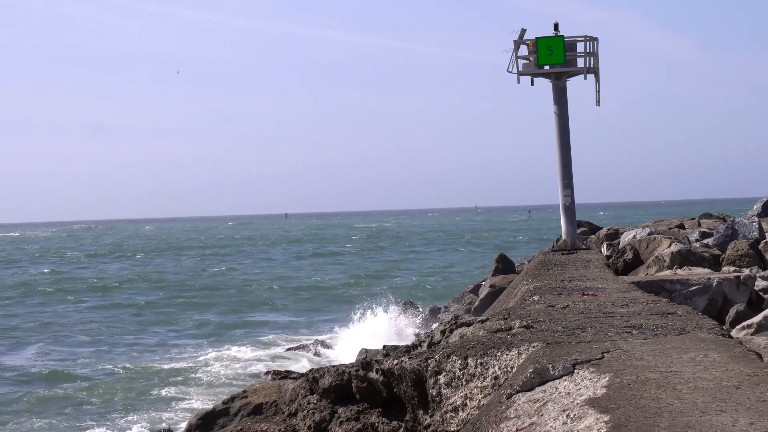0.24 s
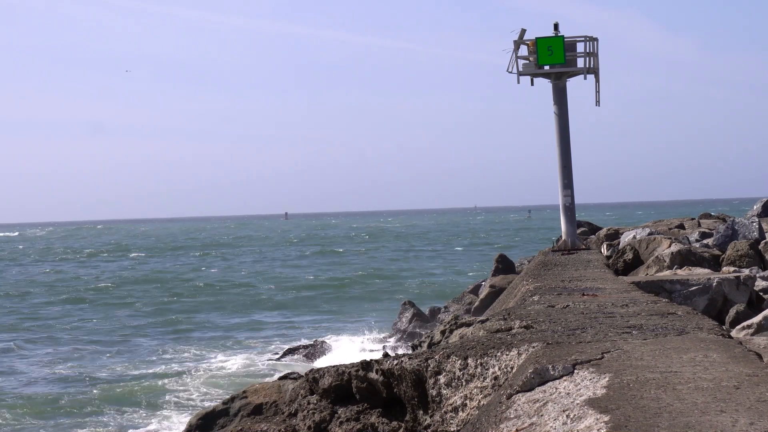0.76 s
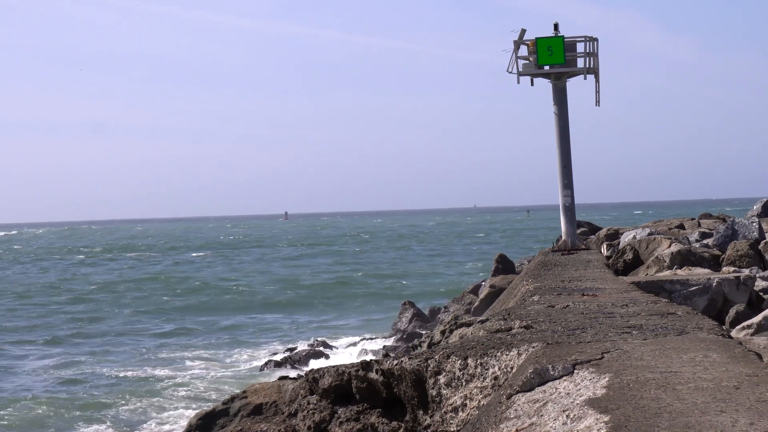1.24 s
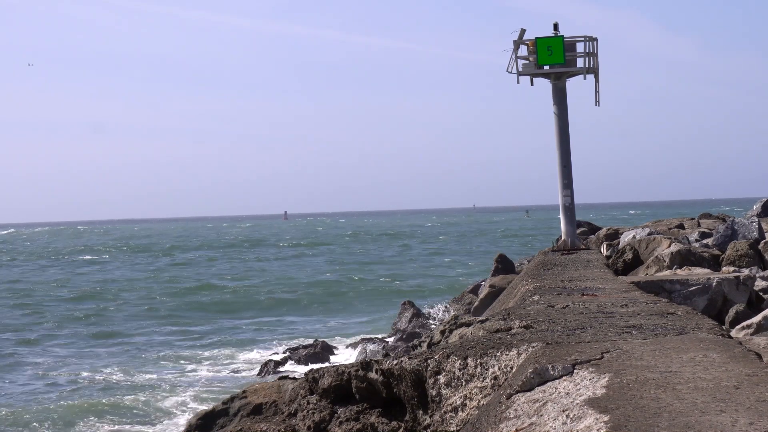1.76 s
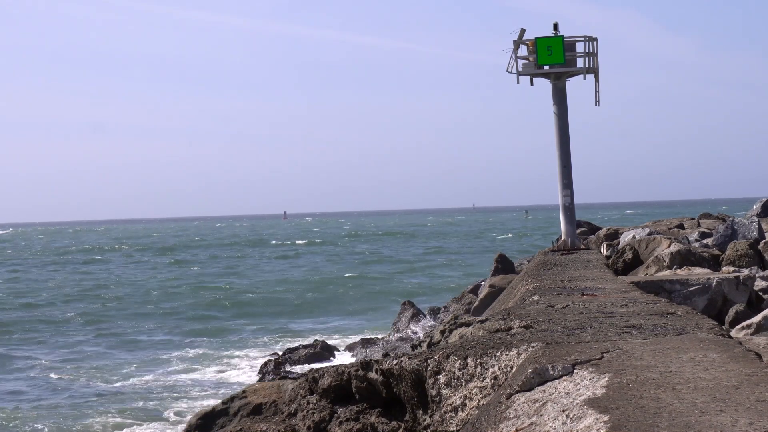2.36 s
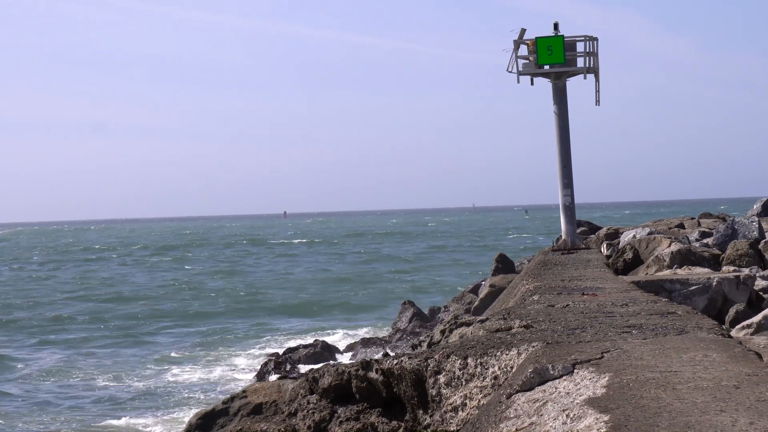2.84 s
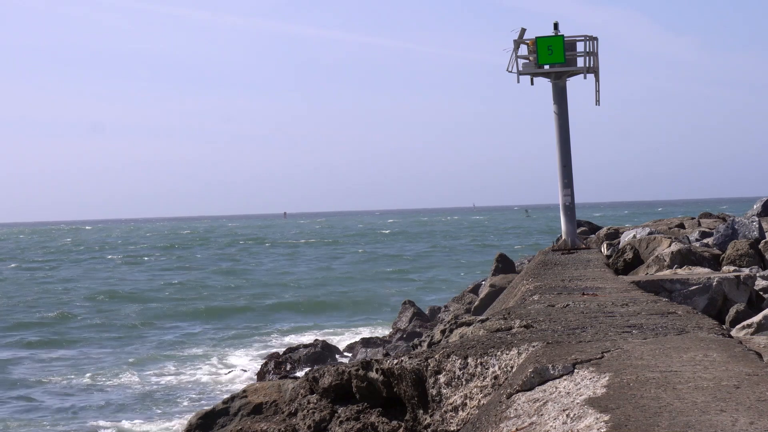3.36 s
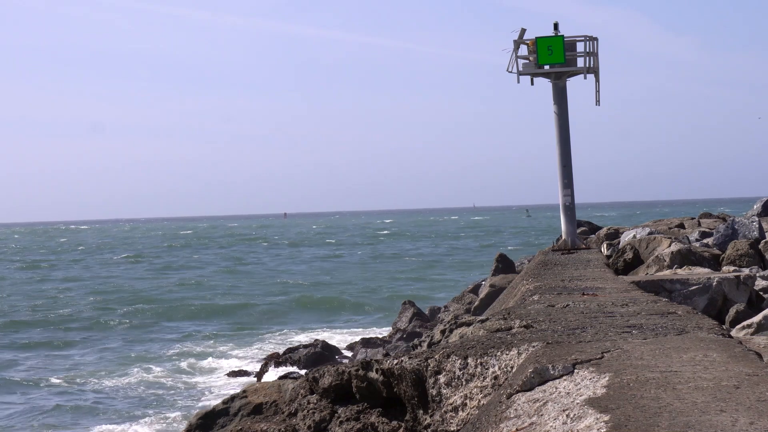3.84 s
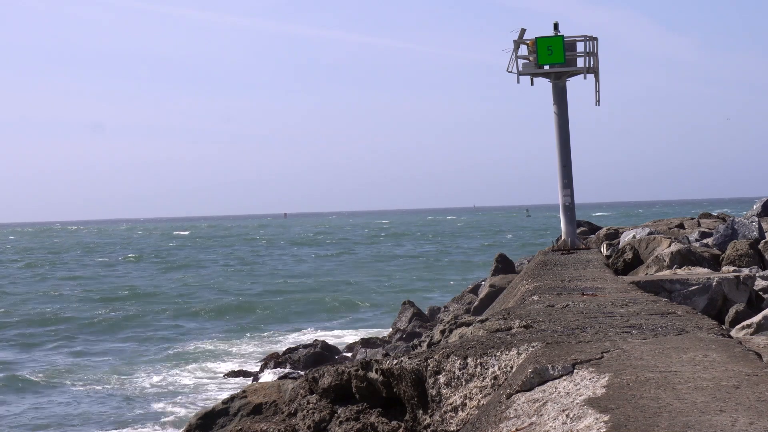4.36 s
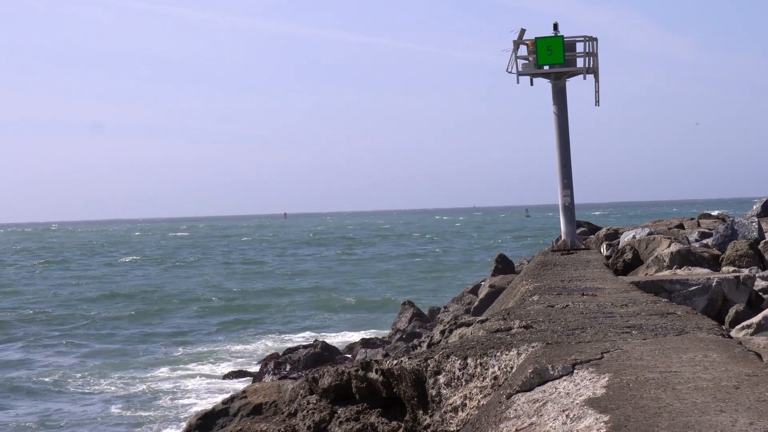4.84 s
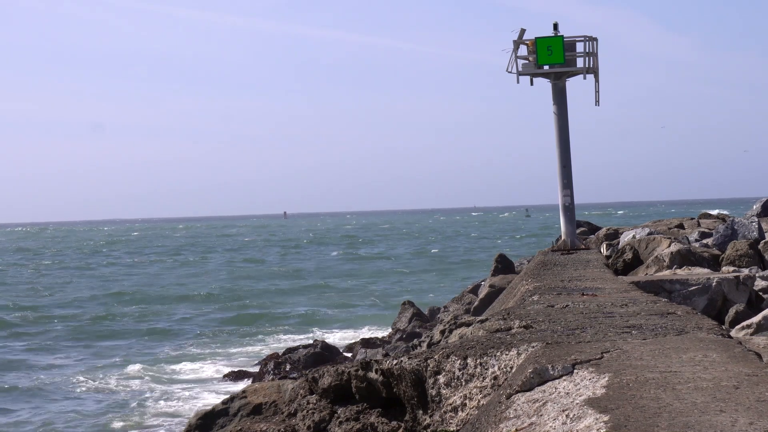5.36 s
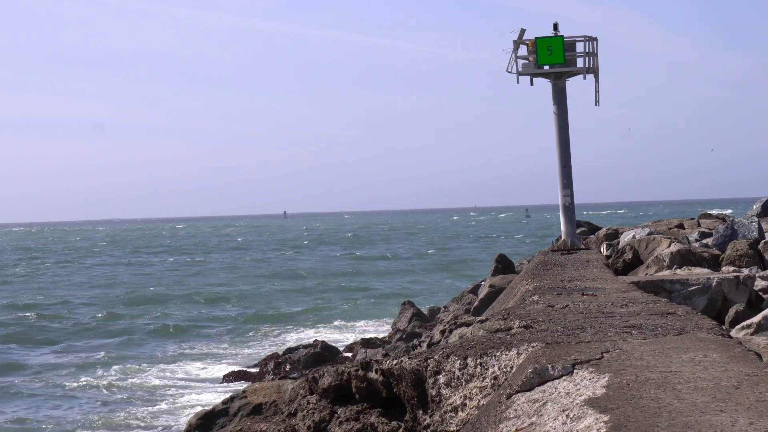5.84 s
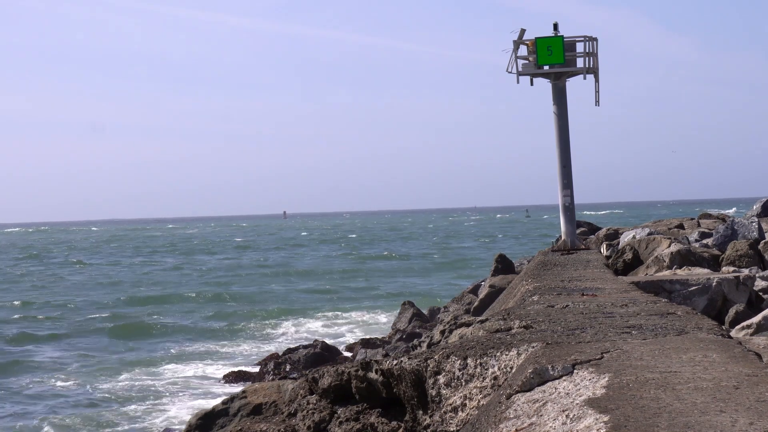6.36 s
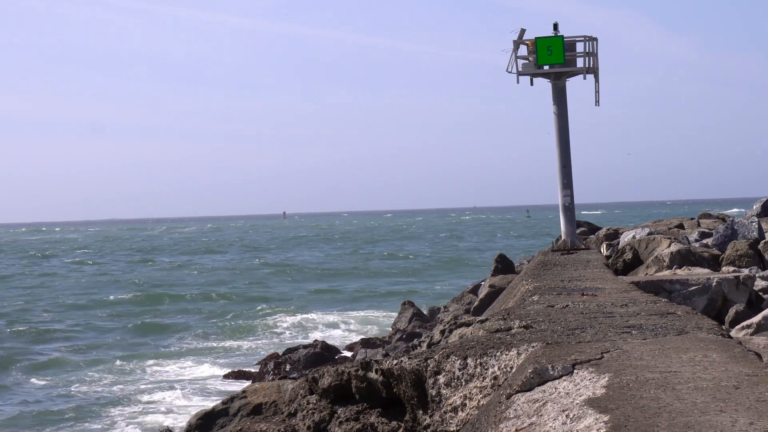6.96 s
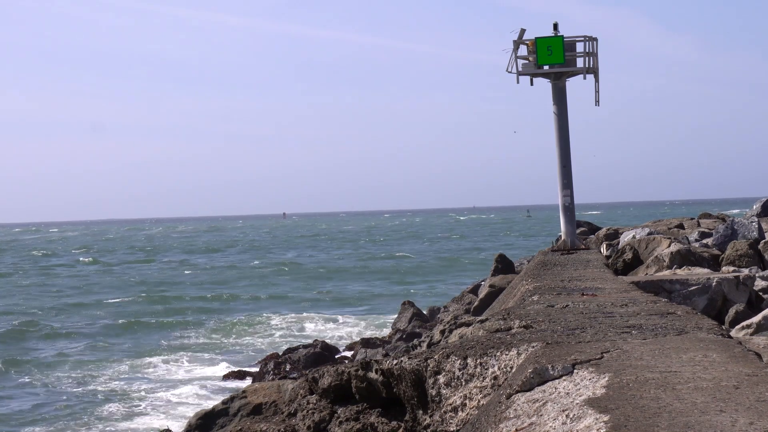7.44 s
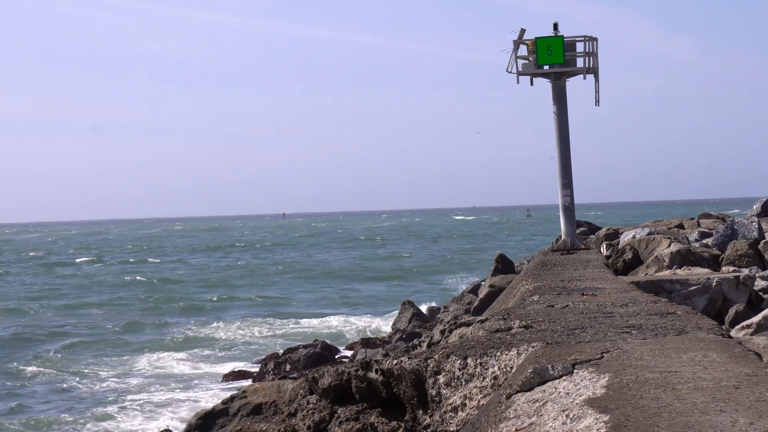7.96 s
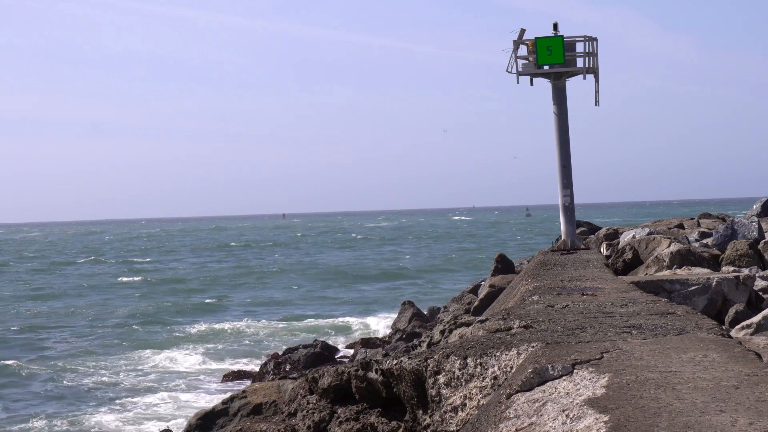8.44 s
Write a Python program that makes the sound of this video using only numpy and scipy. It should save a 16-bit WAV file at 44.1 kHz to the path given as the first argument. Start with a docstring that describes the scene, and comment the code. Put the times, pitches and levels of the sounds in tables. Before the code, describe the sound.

Waves churn and fizz against a jetty in gusty wind, and a foghorn sounds a single three-second tone.

```python
"""Gusts buffet the microphone and surf washes over the rocks of a jetty: churn, fizzing foam, spray.
At 2.5 s an electric foghorn on a mast at the jetty's end holds one three-second blast, the almost
pure tone of a driven diaphragm on a tuned horn. The rocks and the far shore answer faintly.
The camera's gain control pulls the sea down while the horn sounds and lets it swell back."""
import sys
import numpy as np
from scipy import signal
from scipy.fft import rfft, irfft, next_fast_len
from scipy.io import wavfile
from scipy.ndimage import uniform_filter1d, minimum_filter1d, map_coordinates

SR = 44100
rng = np.random.default_rng(int(sys.argv[2]) if len(sys.argv) > 2 else 0)


def generate_wav(sig):
    """Save sig (samples, or channels by samples) to the path in sys.argv[1] as 16-bit PCM at SR."""
    pcm = np.round(np.clip(np.atleast_2d(sig).T, -1, 1) * 32767).astype(np.int16)
    wavfile.write(sys.argv[1], SR, pcm)


N = 383669

HORN_HZ, HORN_ON_S, HORN_OFF_S = 411.65, 2.48, 5.466
# the horn heard through moving air, each partial fading on its own:
# t/s, fundamental level/dB, then level/dB re fundamental of partials 2, 3 and 4
HORN_LEVELS = [(2.5, -14.5, -19.5, -24.5, -39), (2.86, -12.5, -14, -22, -30),
               (3.25, -11.5, -14, -21.5, -37), (3.45, -11.5, -22, -23.5, -35.5),
               (3.85, -12, -13.5, -19.5, -43), (4.38, -12.5, -12, -20, -45.5),
               (4.86, -14.5, -13, -20, -35.5), (5.14, -17.5, -24, -21.5, -44), (5.45, -16, -20, -25, -32.5)]
# the horn's faint top partials: multiple, level/dB re fundamental
HORN_TOP_PARTIALS = [(5, -46.5), (6, -53), (7, -55)]

# breeze on the microphone, with a lull at the end of the blast: t/s, level/dB
BREEZE_LEVELS = [(0, -27.5), (1.75, -30), (2.3, -27.5), (2.7, -21), (3.08, -19), (3.26, -24.5), (4.35, -26),
                 (4.8, -34.5), (5.5, -40), (5.9, -35.5), (6.15, -28.5), (6.7, -33.5), (7.6, -29.5),
                 (8.2, -35.5), (8.7, -29.5)]
# gusts that thump over the breeze: t/s, lift/dB
GUST_LIFTS = [(.11, 5), (.97, 5), (1.26, 7.5), (1.46, 4), (2.12, 3.5), (2.4, 7.5), (2.87, 1), (3.02, 3),
              (6.53, 2), (6.94, 2.5)]
# low rumble of wind on the microphone: f/Hz, relative level/dB
RUMBLE_SPECTRUM = [(5, -8), (18, 2.5), (35, 0.5), (55, -0.5), (78, -4.5), (120, -9), (200, -15.5),
                   (350, -20), (700, -38.5), (4000, -120)]
# flapping above the rumble: f/Hz, relative level/dB
FLAP_SPECTRUM = [(5, -39), (25, -12.5), (60, -3.5), (90, 3), (130, -4), (230, -13), (400, -15.5),
                 (900, -30), (2500, -60), (8000, -120)]
# sharp slaps of wind within the gusts: t/s, level/dB, half length/s
WIND_SLAPS = [(1.285, -32.5, 0.046), (2.438, -34, 0.0041), (3.12, -21, 0.023), (7.417, -33, 0.063)]
# the puff of a slap: f/Hz, relative level/dB
SLAP_SPECTRUM = [(20, -35), (90, -4.5), (200, 1.5), (300, -5), (500, -24), (1000, -19.5), (2000, -39.5),
                 (8000, -120)]

# swell of the sea on the jetty: t/s, level/dB
WASH_LEVELS = [(0, -44), (.2, -45.5), (.45, -43), (1.3, -45), (2.3, -44), (5.5, -44), (6.7, -42.5),
               (7.58, -43.5), (7.82, -42), (8.5, -43.6)]
# water churning between the rocks: f/Hz, relative level/dB
CHURN_SPECTRUM = [(40, -43), (100, -7.5), (170, 1.5), (260, 3.5), (500, -1), (750, 0), (1050, 0),
                  (1350, -8.5), (2000, -17.5), (4000, -44), (12000, -120)]
# foam fizzing on top: f/Hz, relative level/dB
FOAM_SPECTRUM = [(300, -63), (700, -30), (1400, -4.5), (2000, -1), (2600, -3), (3300, -2.5), (4000, -6),
                 (4600, -16.5), (6000, -24.5), (16000, -120)]
# spray pattering down: f/Hz, relative level/dB
SPRAY_SPECTRUM = [(1000, -60.5), (3000, -17.5), (4700, 0.5), (6000, 1.5), (7000, -0.5), (7900, -1),
                  (9000, -6.5), (11500, -11), (13000, -15), (15700, -21.5)]
# waves that throw extra spray, which rises and patters out: t/s, lift/dB, rise/s
SPRAY_THROWS = [(1.9, 1.5, .25), (4.8, 1, 1.2), (7.66, 3, 0.12)]

# the tail scattered back from the shore: f/Hz, time to fall 60 dB/s
SHORE_DECAY = [(400, 1.6), (1200, 1.5), (4000, 0.36)]
# echoes off the jetty's rocks and the far shore: delay/s, level/dB re horn
SHORE_ECHOES = [(.32, -25.5), (1.2, -29)]


def amp(db):
    """Decibels to gain."""
    return 10 ** (np.asarray(db) / 20)


def unit(x):
    """x at rms 1."""
    return x / np.sqrt(np.mean(x ** 2) + 1e-20)


def along(points, hz):
    """(f/Hz, value) points read on a log axis."""
    f, v = np.transpose(points)
    return np.interp(np.log(hz + 1), np.log(f + 1), v)


def curves(rows):
    """One value per sample for each column after the time."""
    times, *columns = np.transpose(rows)
    return [np.interp(np.arange(N) / SR, times, column) for column in columns]


def wobble(rate):
    """A smooth random curve, rate knots a second."""
    coarse = np.arange(0, N + 64, 64)
    knots = rng.standard_normal(int(N * rate / SR) + 4)
    return np.interp(np.arange(N), coarse, map_coordinates(knots, [coarse * rate / SR]))


def filtered(x, response):
    """x times a response of frequency."""
    size = next_fast_len(N + SR // 2)
    return irfft(rfft(x, size) * response(np.fft.rfftfreq(size, 1 / SR)), size)[:N]


def coloured(x, spectrum):
    """x given a spectrum, at rms 1."""
    return unit(filtered(x, lambda hz: amp(along(spectrum, hz))))


def foghorn(rise_s=0.0065, ring_s=0.037, flat_hz=38, settle_s=0.013, sharp_hz=3,
            kick_hz=12, kick_s=0.0079, drift_hz=0.1, flutter_db=0.5, flicker_db=0.9):
    """On the mast, a driven diaphragm on a tuned horn builds up fast and rings down when cut."""
    t = np.arange(N) / SR
    level_db, *overtones_db = curves(HORN_LEVELS)
    since_on, since_off = np.maximum(t - HORN_ON_S, 0), np.maximum(t - HORN_OFF_S, 0)
    swing = (1 - np.exp(-since_on / rise_s)) * np.exp(-since_off / ring_s)
    # it starts flat and locks to the drive; once let go, it jumps up and rings out slightly sharp
    let_go_hz = (t > HORN_OFF_S) * (sharp_hz + kick_hz * np.exp(-since_off / kick_s))
    hz = HORN_HZ - flat_hz * np.exp(-since_on / settle_s) + let_go_hz + drift_hz * wobble(5)
    phase = 2 * np.pi * np.cumsum(hz) / SR
    # turbulent air on the way to the microphone flutters the level and arrival time
    tone = swing * np.sin(phase + 0.061 * wobble(22)) * amp(flutter_db * wobble(19))
    # overtones need a wide swing, and turbulence makes them flicker more than the fundamental
    for multiple, db in [*enumerate(overtones_db, 2), *HORN_TOP_PARTIALS]:
        strength = swing ** 2 * amp(db + flicker_db * wobble(16))
        tone += strength * np.sin(round(multiple) * phase + 0.11 * wobble(20))
    return np.sqrt(2) * amp(level_db) * tone


def wind(gust_half_s=0.052, eddy_db=1.36, flap_db=-8.0, flap_growth=1.2, strong_db=-16):
    """Gusts break into eddies that thump on the microphone; the strongest also flap higher up."""
    t = np.arange(N) / SR
    breeze_db, = curves(BREEZE_LEVELS)
    gusts_db = sum(lift_db * np.exp(-((t - at_s) / gust_half_s) ** 2) for at_s, lift_db in GUST_LIFTS)
    buffet_db = breeze_db + gusts_db
    eddies_db = eddy_db * wobble(24)
    rumble = unit(amp(eddies_db) * coloured(rng.standard_normal(N), RUMBLE_SPECTRUM))
    flap = unit(amp(2 * eddies_db) * coloured(rng.standard_normal(N), FLAP_SPECTRUM))
    flap_level_db = strong_db + flap_db + flap_growth * (buffet_db - strong_db)
    return amp(buffet_db) * rumble + amp(flap_level_db) * flap


def wind_slaps():
    """Tight eddies hit the microphone as short, higher-pitched puffs."""
    t = np.arange(N) / SR
    force = sum(amp(db) * np.exp(-((t - at_s) / half_s) ** 2) for at_s, db, half_s in WIND_SLAPS)
    return force * coloured(rng.standard_normal(N), SLAP_SPECTRUM)


def surf(churn_db=10, spray_db=-15, surge_db=0.5, patter_db=0.7):
    """One swell on the jetty drives all: water churns between rocks, foam fizzes, spray patters down."""
    wash_db, = curves(WASH_LEVELS)
    thrown_db = np.zeros(N)
    for start_s, lift_db, rise_s in SPRAY_THROWS:
        age = np.maximum(np.arange(N) / SR - start_s, 0) / rise_s
        thrown_db += lift_db * age * np.exp(1 - age)
    churn = rush(patchy_db=0.5) + 0.13 * bubbles(count=4000, centre_hz=704, cycles=6.8, spread_db=5.5)
    foam = rush(patchy_db=0.38) + 0.21 * bubbles(count=7000, centre_hz=2550, cycles=4.4, spread_db=14)
    spray = rush(patchy_db=0.6) + 0.3 * bubbles(count=4000, centre_hz=7600, cycles=1.8, spread_db=16.5)
    wavelets_db = surge_db * wobble(16)  # small waves lift foam and spray together
    handfuls_db = patter_db * unit(wobble(14) + wobble(45))  # spray falls in handfuls
    churn = amp(churn_db) * coloured(churn, CHURN_SPECTRUM)
    foam = amp(wavelets_db) * coloured(foam, FOAM_SPECTRUM)
    spray = amp(spray_db + thrown_db + wavelets_db + handfuls_db) * coloured(spray, SPRAY_SPECTRUM)
    return amp(wash_db) * (churn + foam + spray)


def rush(patchy_db):
    """Rushing water: white noise with patches of random gain in time and frequency, at rms 1."""
    noise = signal.stft(rng.standard_normal(N), nperseg=512)[2]
    patches = uniform_filter1d(rng.standard_normal(noise.shape), size=7, axis=0)
    patches = unit(uniform_filter1d(patches, size=14, axis=1))
    return unit(signal.istft(noise * amp(patchy_db * patches), nperseg=512)[1][:N])


def bubbles(count, centre_hz, cycles, spread_db):
    """Bubbles in the surf: short damped rings at random times, pitches and sizes, at rms 1."""
    when, pitch, size = rng.random((count, 3)).T[:, :, None]
    age = np.arange(int(2 * cycles * SR / centre_hz))
    turns = centre_hz * 2 ** (2 * pitch - 1) * age / SR
    rings = amp(spread_db * size ** 3) * np.sin(2 * np.pi * turns) * np.exp(-np.pi * turns / cycles)
    positions = (when * N).astype(int) + age
    return unit(np.bincount(positions.ravel(), rings.ravel(), minlength=N)[:N])


def shore(blast, scatter_db=-29, waver_db=0.72):
    """Rocks and waves scatter a long faint tail, with one echo off the jetty and one from far off."""
    hz, t, noise = signal.stft(rng.standard_normal(2 * SR), SR, nperseg=256)
    decay = amp(-60 * t / along(SHORE_DECAY, hz)[:, None])
    tail = signal.istft(noise * decay, SR, nperseg=256)[1]
    scattered = unit(signal.fftconvolve(blast, tail)[:N])
    echoes = np.zeros(N)
    for delay_s, db in SHORE_ECHOES:
        delayed = np.pad(blast, (round(delay_s * SR), 0))[:N]
        echoes += amp(db + waver_db * wobble(7.7)) * delayed
    return amp(scatter_db) * np.std(blast) * scattered + echoes


def scene():
    """Horn, shore, sea and wind at one microphone."""
    blast = foghorn()
    return (blast + shore(blast) + surf() + wind() + wind_slaps())[None]


def gain_control(x, limit_db=-14.5, sense_s=0.018, attack_s=0.0041, release_db_per_s=18):
    """The camera's gain drops when the peaks pass the limit, then climbs steadily back."""
    peaks = -minimum_filter1d(-np.abs(x), size=SR // 200)
    sensed = uniform_filter1d(peaks, round(sense_s * SR))
    over_db = np.maximum(20 * np.log10(np.abs(sensed) + 1e-9) - limit_db, 0)
    recovery_db = release_db_per_s * np.arange(N) / SR
    cut_db = np.maximum.accumulate(over_db + recovery_db) - recovery_db
    pole = np.exp(-1 / (attack_s * SR))
    return x * amp(-signal.lfilter([1 - pole], [1, -pole], cut_db))


def record(dry, hiss_db=-80.5, top_hz=15750):
    """The camera rides its gain, adds a faint hiss and keeps nothing above its band limit."""
    sound = gain_control(dry[0]) + amp(hiss_db) * rng.standard_normal(N)
    return filtered(sound, lambda hz: hz < top_hz)[None]


dry = scene()
out = record(dry)
generate_wav(out)
```